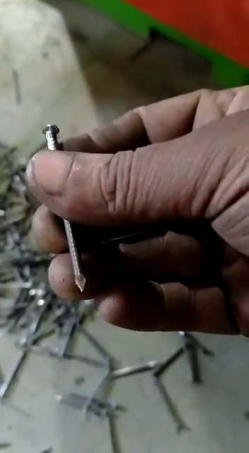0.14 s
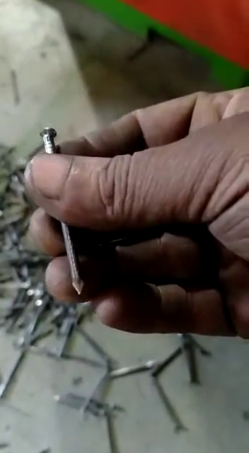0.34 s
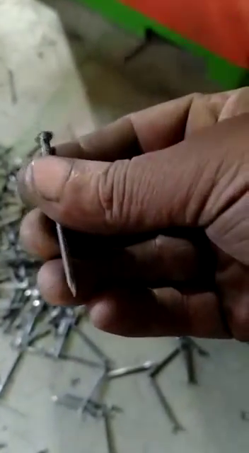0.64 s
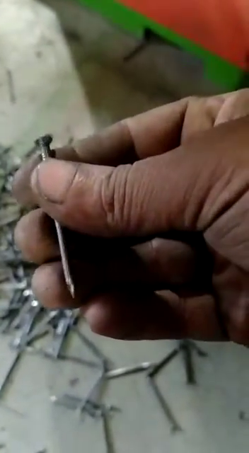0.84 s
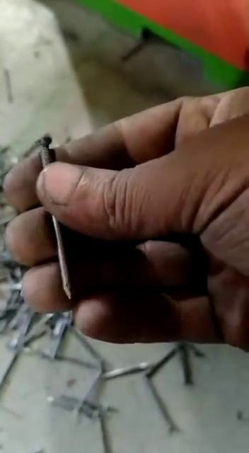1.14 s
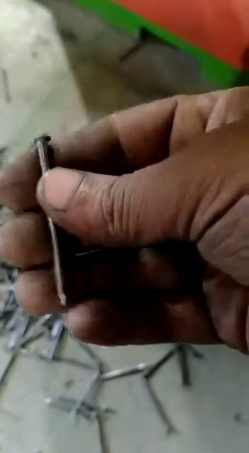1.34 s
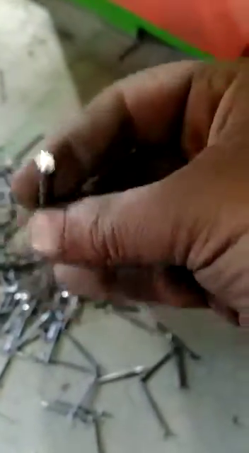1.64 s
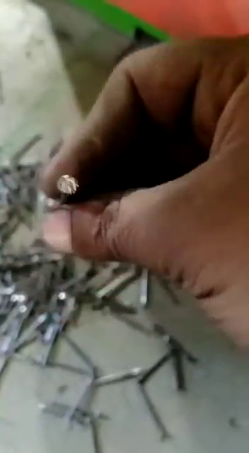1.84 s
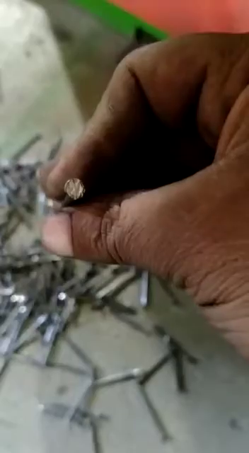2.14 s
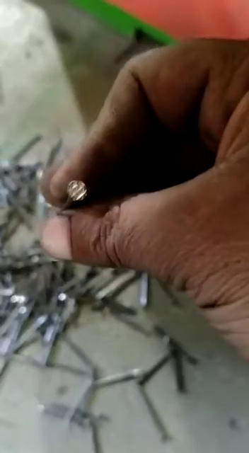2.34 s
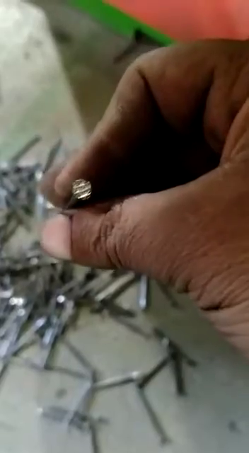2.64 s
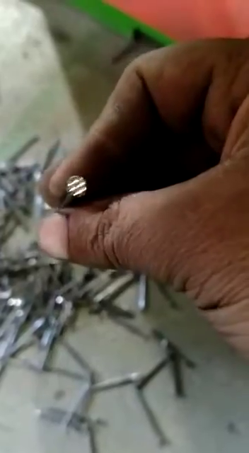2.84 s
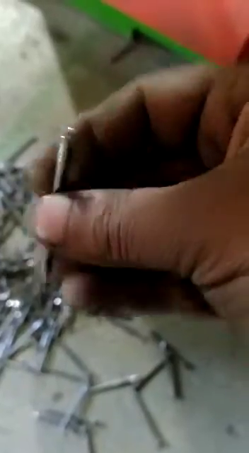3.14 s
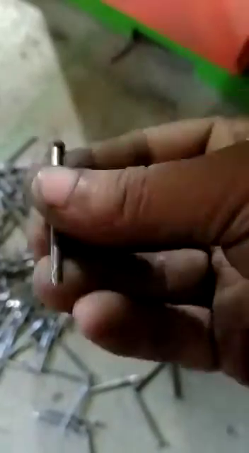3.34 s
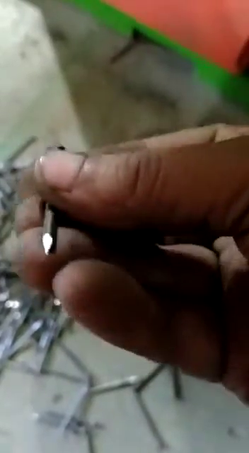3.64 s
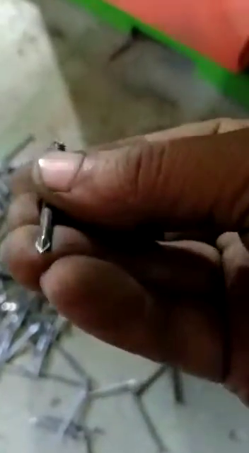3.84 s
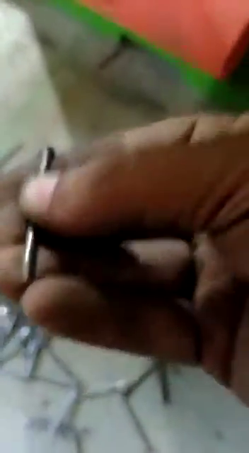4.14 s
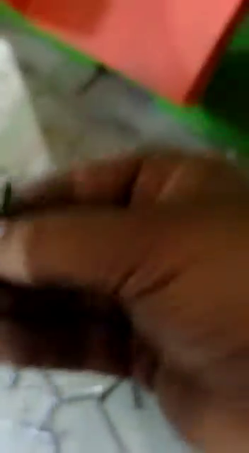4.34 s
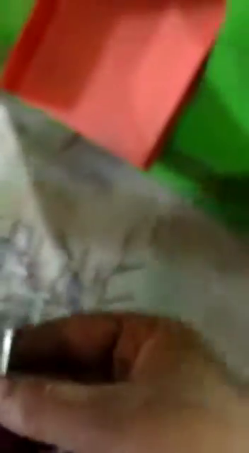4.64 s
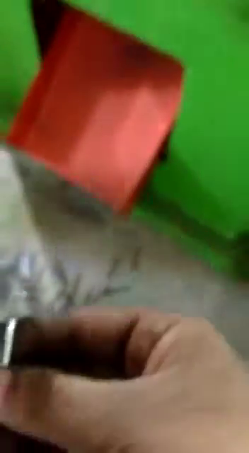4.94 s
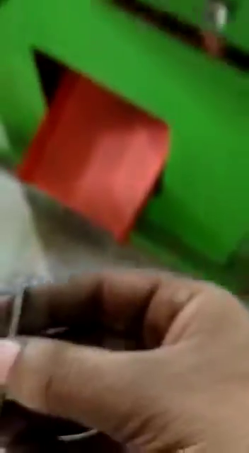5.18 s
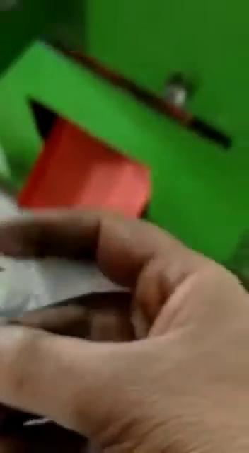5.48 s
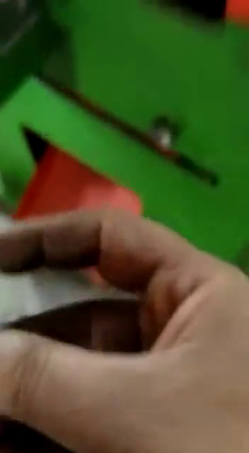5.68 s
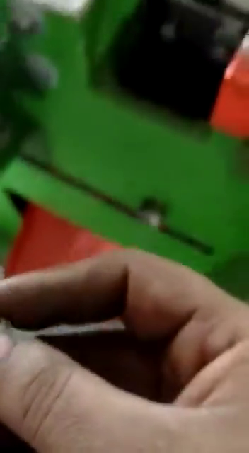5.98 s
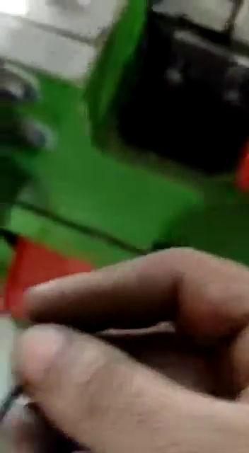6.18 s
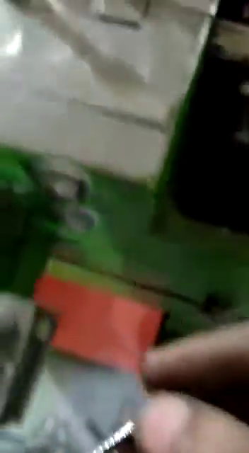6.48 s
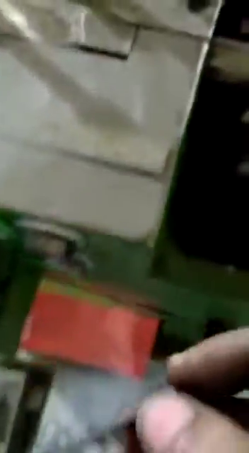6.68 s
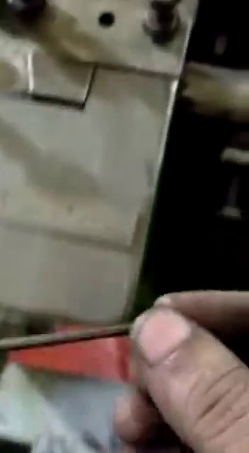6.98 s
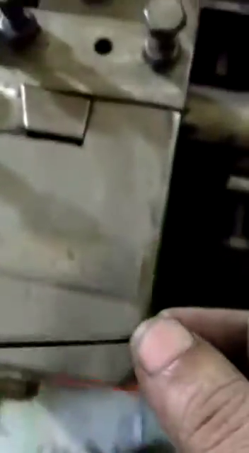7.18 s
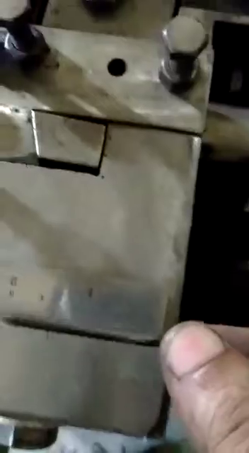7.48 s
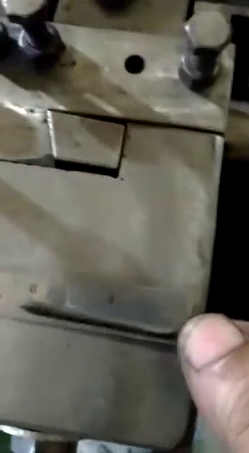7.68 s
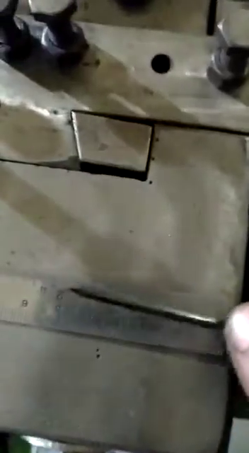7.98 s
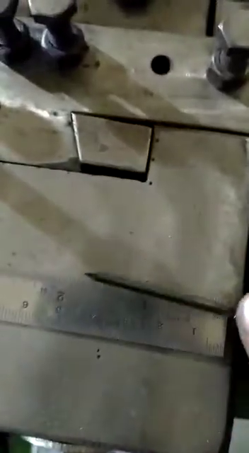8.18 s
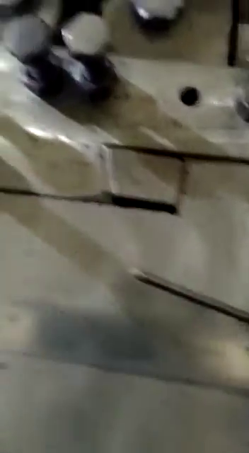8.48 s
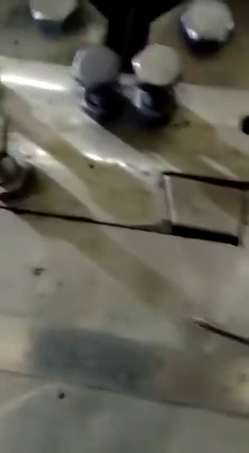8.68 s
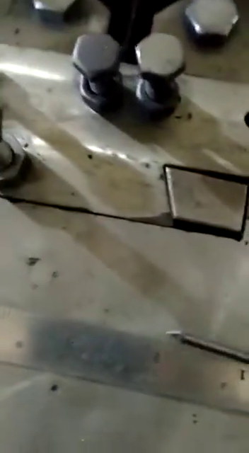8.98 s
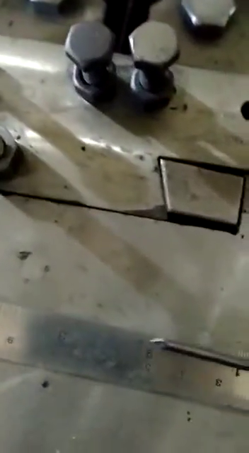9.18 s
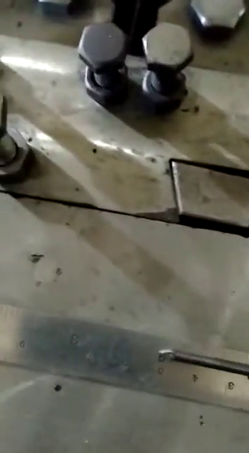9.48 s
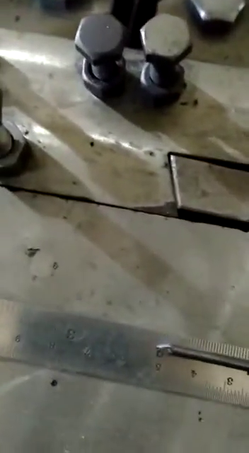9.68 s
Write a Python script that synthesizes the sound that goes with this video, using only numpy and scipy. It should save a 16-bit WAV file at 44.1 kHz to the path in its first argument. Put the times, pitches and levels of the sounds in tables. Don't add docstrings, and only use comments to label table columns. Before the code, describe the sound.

In a hard-walled workshop a nail-making machine runs without pause. A very high, shivering wire squeal sags in pitch and pulses with the cams, above a dense ringing steel rattle and low rumble. Scattered nails ping brightly. Far off, a heavy press thumps about every two seconds with a booming tumble. Heard through a handheld phone, wide stereo, compressed and a little harsh.

```python
import sys
import numpy as np
from scipy import signal
from scipy.fft import rfft, irfft
from scipy.io import wavfile
from scipy.ndimage import uniform_filter1d, minimum_filter1d

SR = 44100
rng = np.random.default_rng(int(sys.argv[2]) if len(sys.argv) > 2 else 0)


def unload_wav(signal):
    wavfile.write(
        sys.argv[1],
        SR,
        np.round(np.clip(np.atleast_2d(signal).T, -1, 1) * 32767).astype(np.int16),
    )


def decibels_to_gain(level_db):
    exponent = np.asarray(level_db, float) / 20
    return 10 ** exponent


N = 433043

# [f/Hz, level/dB]
DIN_SPECTRUM = [(260, -51), (450, -2.5), (550, -6.5), (1660, -6), (2450, -5), (3020, -3.5), (3280, -5),
                (3930, -4.5), (5200, -8), (6000, -8), (6800, -9.5), (7400, -9.5), (8800, -7), (9900, -12),
                (11400, -19.5), (12400, -19.5)]
# [f/Hz, level/dB]
RUMBLE_SPECTRUM = [(15, -56), (25, -32), (119, -5), (181, -2.5), (220, -6), (320, 3), (366, -4.5),
                   (401, 2.5), (479, -17.5), (719, -13.5), (900, -20.5), (1170, -6.5), (1980, -120)]
# [f/Hz, level/dB]
THUD_SPECTRUM = [(41, -64), (70, -46), (210, 3), (248, -5), (353, 2.5), (398, -8.5), (432, 3), (520, -9),
                 (640, -13.5), (1800, -17.5), (2340, -68), (3960, -120)]
# [f/Hz, likeness/1]
LIKENESS = [(60, 1), (130, 0.98), (270, 0.92), (580, 0.39), (1240, 0.031), (2640, -0.098), (5630, 0.12),
            (12000, -0.16)]
# [f/Hz, left minus right/dB]
LEAN_LEFT = [(60, 5), (130, -3), (270, 1.5), (580, -5.5), (1240, -3), (2640, -0.5), (5630, -3),
             (12000, -13)]

# [t/s, level/dB, boom f/Hz]
PRESS_STROKES = [
    (1.741, -11.5, 350),
    (3.899, -10, 336),
    (6.061, -13, 220),
    (8.186, -12.5, 296),
]
# [delay/s, level/dB, share of the blow's own pitch beside the hall's/1]
TUMBLE_BLOWS = [
    (0, -0.5, 0.29),
    (.051, -9.5, 0.7),
    (.125, -9.5, 0.856),
]
# [t/s, level/dB, boom f/Hz]
LIGHT_KNOCKS = [(1.013, -18.5, 316), (1.089, -22, 374), (1.449, -23, 350), (1.75, -25, 193),
                (1.93, -17.5, 339), (2.049, -17, 325), (2.23, -24, 304), (2.667, -30, 376),
                (3.219, -17, 312), (3.905, -22, 345), (4.08, -17, 368), (4.47, -22, 346), (5.353, -16, 339),
                (5.799, -20, 291), (6.124, -17, 292), (6.126, -22, 207), (6.16, -25, 201),
                (6.205, -21.5, 208), (6.31, -25, 303), (6.38, -19, 353), (7.323, -21, 341),
                (8.295, -20, 194), (8.388, -26, 316), (9.662, -20.5, 390), (9.72, -25, 265)]
# [start t/s, length/s, level/dB]
PLATE_SHAKES = [(1.779, 0.11, -14.5), (2.069, 0.06, -24.5), (3.848, 0.028, -23), (3.947, 0.03, -25),
                (3.999, 0.044, -30), (4.098, 0.029, -30), (6.078, 0.055, -22), (6.15, 0.042, -34),
                (6.245, 0.04, -26), (8.208, 0.057, -17.5), (8.331, 0.032, -24), (8.379, 0.043, -24)]

# [t/s, wire pulls done/1]
PULLS_DONE = [(-.235, -1), (2.92, 10), (4.358, 15), (5.528, 19), (6.677, 23), (10.1, 35)]
# [place/turns, width/turns, squeal level/dB, rattle level/dB]
CAM_STROKES = [
    (.11, .095, -3.6, 1.1),
    (.53, .07, -2.4, .7),
]
# [squeal/dB, rattle/dB at the first stroke, squeal/dB, rattle/dB at the second]
TURN_CHANGES = [(1.0, -2.0, 11, -6), (1.5, -0.5, -7, -3.5), (-0.5, 0, -1, -2), (1.5, -1, 1.5, -1),
                (0, 0, -6.5, 0), (-1, -0.5, -0.5, -2), (-1, -1, -2, 0), (4.5, 3.5, -1, -1.5),
                (0.5, -0.5, -3, -3), (3.5, -0.5, -2, 0), (7, 1, 2, -0.5), (8, 2, 1.5, -0.5),
                (5, 1, 3.5, 0.5), (4, 3.5, 3.5, 2), (4.5, 4, -1.5, 0), (-1.5, -1, -0.5, -0.5),
                (0.5, 0.5, 0.5, 1), (1, 0, -3, -1), (4.5, 1, 3, 0), (3, 1, 3.5, 2.5), (3, 0, 3, 2),
                (0.5, 0, 3, 2), (-3, 1.5, 2.5, 0), (-0.5, 1, -3.5, -1.5), (2, 0.5, -2, -1),
                (-3.5, -2, 2, -1), (-1, 0.5, 4, 0.5), (3.5, -0.5, 2, -0.5), (-1, -0.5, -2.5, -1.5),
                (-2, -1, -1, 1), (-2, 0, 0.0, 0.5), (1.5, 1, 5, 1), (2.5, 1, 1, -2), (7, 2, 6, 1),
                (2, 1, 2.5, 3), (-13, -5, -0.5, -1.0)]

# [f/Hz, width/Hz]
FRAME_MODES = [(402, 16), (735, 16), (1302, 16), (1957, 36), (2281, 24), (2419, 22), (2501, 24), (2616, 90),
               (3204, 18), (3262, 34), (3335, 60), (3613, 24), (3744, 32)]
FRAME_LEVELS = [-6.5, -12, -8, -11.5, -2, -3.5, -2.5, -3, 0, 1.5, -2, -5.5, -10]
FRAME_TURNED = [-0.5, 1, -2, 0, -1.5, -1, 0.5, -2, 0, 1, -2.5, 3, -5]
PHONE_TURN = (3, 3.4)
# [f/Hz, width/Hz]
CHUTE_MODES = [(3920, 60), (4170, 70), (4238, 30), (4487, 50), (4585, 26), (4730, 36), (4885, 60),
               (5047, 40), (5405, 45), (5480, 50), (6068, 60), (6445, 120), (8570, 500)]
CHUTE_LEVELS = [-10, -13, -8, -4.5, -13.5, -6.5, -10.5, -8.5, -7, -7, -6, -8, -11]
# [start t/s, stop t/s, level/dB]
WIRE_SCRAPES = [
    (7.4, 6.3, 3),
    (7.53, 7.71, 1.5),
    (5.55, 5.72, -3),
]

# [t/s, level/dB, f/Hz, left minus right/dB]
NAIL_PINGS = [(0.052, -21, 4487, 4), (0.095, -27, 3744, 12), (0.333, -24, 4487, 0), (0.525, -24, 4487, 12),
              (0.656, -20, 4487, 7), (0.796, -23, 4487, 2), (0.897, -21, 4487, 3), (1.027, -20, 3613, 13),
              (1.197, -22, 3613, 12), (1.22, -24, 4487, 6), (1.378, -23, 3744, 2), (1.471, -28, 3613, 3),
              (1.634, -16, 3613, 7), (1.711, -25, 4487, 6), (1.981, -27, 3613, 11), (2.796, -25, 1302, 2),
              (2.834, -20, 3613, 10), (2.917, -28, 1302, 4), (2.927, -21, 3613, 8), (3.036, -25, 1302, 0),
              (3.092, -16.5, 3613, 4), (3.18, -24, 4487, 11), (3.194, -23, 3613, 12), (3.243, -24, 1302, 5),
              (3.438, -25, 3613, 12), (3.502, -28, 1302, 2), (3.697, -19, 3613, 1), (5.008, -24, 4487, -2),
              (5.157, -24, 3613, 12), (5.636, -21, 3744, 9), (6.036, -22, 3613, 5), (6.673, -24, 1302, 0),
              (6.714, -21, 4487, -4), (6.751, -22, 3613, 3), (7.279, -22, 3613, 12), (7.566, -24, 4487, 6),
              (7.599, -24, 3613, 4), (7.651, -24, 4487, 12), (8.632, -17, 3613, 2), (9.228, -20, 4487, 2),
              (9.497, -17.5, 3613, 3),
              (0.269, -23, 3262, 7), (0.385, -20, 3262, 10), (0.527, -21, 3340, 6), (0.665, -17, 3340, 0),
             (0.862, -20, 3204, 9), (0.884, -22, 3340, 10), (1.094, -22, 3262, 12), (1.181, -15, 3262, -3),
             (1.816, -22, 3340, 9), (1.986, -21, 3262, 12), (2.078, -17, 3262, -8), (2.212, -19, 3204, 2),
             (2.355, -21, 3262, 12), (2.5, -16, 3340, 2), (2.636, -21, 3262, 2), (2.682, -21, 3340, 12),
             (2.808, -25, 3204, 11), (2.808, -23, 3262, 3), (2.961, -22, 3262, -7), (3.399, -24, 3340, 8),
             (3.506, -17, 3204, 4), (3.527, -25, 3340, -1), (3.809, -22, 3262, 5), (4.184, -17, 3204, 2),
             (4.916, -19, 3204, 11), (5.022, -20, 3340, -10), (5.285, -23, 3340, 12), (5.608, -31, 3340, 2),
             (5.648, -22, 3262, 9), (6.074, -24, 3204, 5), (6.731, -27, 3204, 1), (6.793, -22, 3340, 12),
             (7.569, -28, 3340, 12), (7.959, -17.5, 3262, 10), (8.127, -21, 3262, 4), (8.352, -21, 3340, 5),
             (8.696, -18, 3262, 14), (8.855, -23, 3262, 2), (9.073, -21, 3262, 12), (9.126, -18, 3340, 4),
             (9.205, -16.5, 3204, 12), (9.252, -13, 3262, -1), (9.309, -20, 3340, -10),
             (9.644, -21, 3340, 11), (9.736, -16, 3262, -5),
              (0.204, -17.5, 2501, -5), (0.321, -28, 2501, 11), (0.482, -23, 2501, 1),
             (0.676, -20.5, 2281, 11), (0.723, -22, 2419, 8), (0.81, -21, 2501, 9), (0.986, -24, 2419, 12),
             (1.037, -22, 2501, 11), (1.575, -22, 2419, 9), (1.756, -22, 2501, -6), (2.364, -21, 2419, 12),
             (2.41, -19.5, 2281, 13), (2.5, -18, 2419, 6), (2.531, -20, 2281, 12), (2.65, -19, 2501, -10),
             (2.79, -20, 2281, 9), (3.086, -20, 2281, 14), (3.186, -34, 2281, 2), (3.245, -27, 2419, 12),
             (3.345, -24, 2281, 0), (3.477, -23, 2281, 12), (3.619, -16, 2501, 1), (3.695, -25, 2501, 11),
             (3.948, -20, 2419, 7), (4.093, -20, 2419, 8), (4.224, -17.5, 2281, 9), (4.247, -20, 2419, 10),
             (4.343, -20, 2501, -4), (4.658, -24, 2501, 6), (5.08, -23, 2281, 7), (5.234, -21, 2501, -3),
             (5.353, -26, 2501, 1), (5.642, -24, 2419, 0), (5.917, -18, 2419, 6), (6.218, -21, 2281, 12),
             (6.219, -12, 2501, 4), (6.411, -22, 2501, -5), (6.487, -25, 2501, 0), (6.725, -17, 2419, 13),
             (7.62, -17.5, 2281, 0), (7.843, -22, 2419, 6), (8.1, -28, 2419, 9), (8.104, -27, 2281, 6),
             (9.363, -16.5, 2419, 11)]

# [t/s, squeal f/Hz, sag at a pull/Hz, drift of guide modes/Hz, second contact level/dB]
WIRE_TENSION = [(0, 10815, 118, -25, -17), (1.5, 10808, 120, -28, -18), (2.3, 10780, 108, -45, -22),
                (2.9, 10790, 115, -40, -18), (3.6, 10820, 100, -8, -11), (5, 10830, 98, 0, -9),
                (6.2, 10842, 104, 8, -9), (8, 10838, 100, 10, -9), (9.82, 10846, 108, 12, -9)]
# [f/Hz, width/Hz]
GUIDE_MODES = [(10845, 90), (10698, 60), (10770, 70), (10950, 70)]
GUIDE_SHARES = [.9, .95, -.25, .45]
# [t/s, width/s, left level/dB, right level/dB]
GRIP_SLIPS = [(2.78, 0.066, -0.5, -4.5), (3.25, 0.03, -4, -5.5), (4.97, 0.019, -3, 3),
              (5.42, 0.021, 6.5, 8), (5.64, 0.064, -12.5, -13.5), (6.6, 0.062, 6, 0),
              (6.78, 0.046, -9.5, -7.5), (7.58, 0.045, -6.5, -4.5), (9.05, 0.024, 0.5, 8),
              (9.43, 0.019, 10, -6)]
# [t/s, squeal level/dB, squeal left minus right/dB, din level/dB, din left minus right/dB]
PHONE_MOVES = [(0, -13.5, 2, -21, 3.5), (1.5, -13.5, 0.7, -21.5, 4), (2.7, -14.5, 0, -21, 4),
               (3.6, -14.5, 2.5, -22.5, 4.5), (5, -13, 4, -22.5, 3.5), (6.3, -13.5, -0.7, -22.5, 3.5),
               (7.5, -10.5, 2.5, -21.5, 4), (9.82, -11.5, 2.7, -22.5, 4.5)]


def evened(x):
    return x / np.sqrt(np.mean(x ** 2, -1, keepdims=True) + 1e-20)


def steadied(x):
    return x / np.sqrt(uniform_filter1d(x ** 2, size=3500, axis=1))


def read(points, hz):
    f, value = np.transpose(points)
    return np.interp(np.log(hz + 1), np.log(f + 1), value)


def curve(rows, axis):
    rows = np.array(rows)
    return np.interp(np.arange(N) / SR, rows[:, 0], rows[:, axis])


def placed(db, pan_db):
    return decibels_to_gain(np.array([db + pan_db / 2, db - pan_db / 2]))


def bumps(place, rows, axis):
    return sum(row[axis] * np.exp(-((place - row[0]) / row[1]) ** 2) for row in rows)


def wander(rate_hz, channels):
    z = rfft(rng.standard_normal((channels, N)))
    smooth = np.exp(-(np.fft.rfftfreq(N, 1 / SR) / rate_hz) ** 2)
    return evened(irfft(z * smooth, N))


def wash(spectrum, patchy_db, count=513):
    hz = np.fft.rfftfreq(1024, 1 / SR)[:count]
    a, b, c, d, patches = rng.standard_normal((N // 256 + 5, count, 5)).T
    patches = uniform_filter1d(patches, size=14, axis=0)
    patches = uniform_filter1d(patches, size=10, axis=1)
    same = np.clip(read(LIKENESS, hz), -1, 1)[:, None]
    left = a + 1j * b
    right = same * left + np.sqrt(1 - same ** 2) * (c + 1j * d)
    db = read(spectrum, hz)[:, None] + patchy_db * patches / patches.std()
    z = np.zeros((2, 513, a.shape[1]), complex)
    z[:, :count] = left, right
    z[:, :count] *= placed(db, read(LEAN_LEFT, hz)[:, None])
    x = signal.istft(z, nperseg=1024, noverlap=768)[1][:, :N]
    return x / x.std()


def hall(x, t60, direct_db, size):
    padded = np.pad(x, (size, 2 * size))
    pieces = np.lib.stride_tricks.sliding_window_view(padded, 2 * size)[::size]
    decay = decibels_to_gain(-60 * np.arange(2 * size) / SR / t60)
    tail = rng.standard_normal((len(pieces), 2, 2 * size)) * decay
    tail /= np.linalg.norm(tail, axis=2, keepdims=True)
    tail[:, :, 0] = decibels_to_gain(direct_db) * np.sign(tail[:, :, 0])
    faded = pieces * signal.windows.cosine(2 * size)
    heard = signal.fftconvolve(faded[:, None], tail, axes=2)
    out = np.zeros((2, (len(pieces) + 4) * size))
    for k, piece in enumerate(heard):
        out[:, k * size:][:, :piece.shape[1]] += piece
    return out[:, size:size + N]


def cams(axis):
    pulls = curve(PULLS_DONE, axis=1)
    changes = []
    for turn, row in enumerate(TURN_CHANGES):
        for k, stroke in enumerate(CAM_STROKES):
            changes.append((turn - 1 + stroke[0], stroke[1] + .03, row[2 * k + axis - 2]))
    change = np.repeat(bumps(pulls[::64], changes, axis=2), 64)[:N]
    usual = bumps(pulls % 1, CAM_STROKES, axis) + bumps(pulls % 1 - 1, CAM_STROKES, axis)
    return usual + change


def slips_db():
    t = np.arange(N) / SR
    return np.array([bumps(t, GRIP_SLIPS, axis=2), bumps(t, GRIP_SLIPS, axis=3)])


def scrapes_db():
    t = np.arange(N) / SR
    total = 0
    for start, stop, db in WIRE_SCRAPES:
        total = total + db * np.clip((t - start) / 0.046, 0, 1) * np.clip((stop - t) / .008, 0, 1)
    return total


def rumble():
    din_change_db = curve(PHONE_MOVES, axis=3) + 22.34 + cams(axis=3)
    rumble_db = -31.5 + 1.23 * din_change_db
    return wash(RUMBLE_SPECTRUM, patchy_db=0.0, count=48) * placed(rumble_db, .1)


def blows():
    hall_hz = 345
    every = list(LIGHT_KNOCKS)
    for s, db, hz in PRESS_STROKES:
        for late, more_db, own in TUMBLE_BLOWS:
            every.append((s + late, db + more_db, hall_hz + own * (hz - hall_hz)))
    return every


def thumps():
    boom_t60, thud_t60 = 0.37, 0.53
    plate_hz, plate_rise_s, plate_t60 = 401, 0.019, 0.27
    t = np.arange(SR // 2) / SR
    out = np.zeros((2, N + SR))
    body = np.pad(wash(THUD_SPECTRUM, patchy_db=1.2, count=90), ((0, 0), (0, SR)))
    for s, db, hz in blows():
        at = round(s * SR)
        boom = np.sin(2 * np.pi * hz * t) * decibels_to_gain(-6.5 - 60 * t / boom_t60)
        thud = body[:, at:at + len(t)] * decibels_to_gain(-9.0 - 60 * t / thud_t60)
        onset = 1 - np.exp(-t / 0.0029)
        out[:, at:at + len(t)] += decibels_to_gain(db) * onset * (boom + thud)
    for s, length, db in PLATE_SHAKES:
        dying_s = np.maximum(t - 0.56 * length, 0)
        shape = (1 - np.exp(-t / plate_rise_s)) * decibels_to_gain(db + 3.5 - 60 * dying_s / plate_t60)
        out[:, round(s * SR):][:, :len(t)] += shape * np.sin(2 * np.pi * plate_hz * t)
    return out[:, :N]


def rattle():
    modes = FRAME_MODES + CHUTE_MODES
    levels = FRAME_LEVELS + CHUTE_LEVELS
    late_levels = FRAME_TURNED + [0] * len(CHUTE_MODES)
    struck = rng.random(N) < 6500 / SR
    size = decibels_to_gain(1.3 * np.minimum(rng.exponential(1, N), 5)) * struck
    mode = rng.integers(0, len(modes), N)
    echoes = rng.standard_normal((2, N))
    turned = np.interp(np.arange(N) / SR, PHONE_TURN, [-.5, .5])
    rings = np.zeros((2, N))
    for k, ((hz, width), db, late_db) in enumerate(zip(modes, levels, late_levels)):
        smeared = signal.lfilter([1], [1, -np.exp(-1 / (.035 * SR))], size * (mode == k))
        push = smeared * (echoes if k else echoes[[0, 0]])
        r = np.exp(-np.pi * 1.3 * width / SR)
        poles = [1, -2 * r * np.cos(2 * np.pi * hz / SR), r * r]
        ring = evened(signal.lfilter([1], np.convolve(poles, poles), push))
        ring /= uniform_filter1d(ring ** 2, size=4000, axis=1) ** .32
        rings += ring * placed(db, read(LEAN_LEFT, hz))[:, None] * decibels_to_gain(late_db * turned)
    return rings / rings.std()


def din():
    clatter = .2
    flicker = wander(rate_hz=73, channels=3)
    flicker = decibels_to_gain(0.5 * flicker[:2] + 0.63 * flicker[2])
    mix = wash(DIN_SPECTRUM, patchy_db=1.0) * flicker + decibels_to_gain(-3.5) * rattle()
    db = curve(PHONE_MOVES, axis=3) + cams(axis=3) + 2.66
    gains = placed(db, curve(PHONE_MOVES, axis=4))
    return mix / mix.std() * gains * decibels_to_gain(scrapes_db() - clatter * slips_db())


def pings():
    t = np.arange(SR // 4) / SR
    out = np.zeros((2, N + SR))
    rows = NAIL_PINGS
    shape = decibels_to_gain(-2.5 - 60 * t / .36) * (1 - np.exp(-t / .012))
    phases = rng.random((len(rows), 2, 1)) * [[0], [.25]]
    for (s, db, hz, pan_db), phase in zip(rows, phases):
        ring = shape * np.sin(2 * np.pi * (hz * t + phase))
        out[:, round(s * SR):][:, :len(t)] += placed(db, pan_db)[:, None] * ring
    return out[:, :N]


def pitch():
    sag_turns, rebound_turns = .42, .29
    turn = curve(PULLS_DONE, axis=1) % 1
    slack = np.maximum(1 - turn / rebound_turns, 1 - (1 - turn) / sag_turns).clip(0, 1)
    sag = np.sin(np.pi / 2 * slack) ** 2
    return curve(WIRE_TENSION, axis=1) - curve(WIRE_TENSION, axis=2) * sag


def grip_db():
    uneven = wander(rate_hz=6.0, channels=2)
    uneven -= uniform_filter1d(uneven, size=14000, axis=1)
    return slips_db() + cams(axis=2) + 0.23 * uneven


def squeal():
    shiver, other = wander(rate_hz=200, channels=2).clip(-2.6, 2.6)
    shiver -= uniform_filter1d(shiver, size=1800)
    pull = np.roll(pitch(), -800)
    shiver_hz = 58 + .08 * (curve(WIRE_TENSION, axis=1) - pull)
    hz = 10800 + 1.35 * (pull - 10800) + shiver_hz * shiver - 8 * (shiver ** 2 - 1)
    grip = decibels_to_gain(2.2 * wander(rate_hz=130, channels=1)[0])
    drift = curve(WIRE_TENSION, axis=3)
    tone = grip * np.exp(2j * np.pi * np.cumsum(hz - drift) / SR)
    steady_hz = 10870 + 50 * other
    tone += decibels_to_gain(curve(WIRE_TENSION, axis=4)) * np.exp(2j * np.pi * np.cumsum(steady_hz) / SR)
    ringing = 0
    for (mode_hz, width), share in zip(GUIDE_MODES, GUIDE_SHARES):
        ringing = ringing + share * signal.lfilter(*signal.iirpeak(mode_hz, mode_hz / width, SR), tone)
    tone = tone + ringing
    tone = (tone * np.exp(2j * np.pi * np.cumsum(drift) / SR)).real
    left, right = hall(tone, t60=.32, direct_db=-24, size=4500)
    mid, side = steadied(np.array([left + right, left - right]))
    both = steadied(np.array([mid + side, mid - side]))
    gains = placed(curve(PHONE_MOVES, axis=1) + 4.13, curve(PHONE_MOVES, axis=2))
    return both * gains * decibels_to_gain(grip_db())


def scene():
    far_press = thumps() * decibels_to_gain(np.array([[-.6], [.6]]))
    return rumble() + far_press + din() + pings() + squeal()


def thinned(x, weak_db, open_share):
    hz, _, z = signal.stft(x, SR, "cosine", nperseg=2048, noverlap=1024)
    power = (abs(z) ** 2).sum(0)
    nearby = uniform_filter1d(power, size=40, axis=0)
    valley = uniform_filter1d(power, size=5, axis=0) < decibels_to_gain(2 * weak_db) * nearby
    keep = ~valley | ((hz < 3750) | (hz > 10080))[:, None]
    for lo_hz, hi_hz in ((10080, 10280), (11090, 11270)):
        flank = (hz > lo_hz) & (hz <= hi_hz)
        flank_power = power[flank].sum(0)
        keep[flank] = flank_power > np.quantile(flank_power, .1)
    top = hz > 11270
    level = uniform_filter1d(power[top], size=12, axis=0) + 2 * power[top].mean(0)
    level = level * power.sum(0)
    level /= uniform_filter1d(level, size=14, axis=1) ** .75
    keep[top] = level > np.quantile(level, 1 - open_share)
    return signal.istft(z * keep, SR, "cosine", nperseg=2048, noverlap=1024)[1][:, :N]


def roll_off(x):
    return signal.sosfilt(signal.butter(12, 11980, fs=SR, output="sos"), x)


def record(dry):
    level_db = 10 * np.log10(abs(uniform_filter1d(dry ** 2, size=2600, axis=1)) + 1e-12)
    lifted = dry / decibels_to_gain(0.3 * uniform_filter1d(level_db + 12.5, size=900, axis=1))
    top = -minimum_filter1d(-abs(lifted), size=64, axis=1)
    over_db = np.maximum(20 * np.log10(top + 1e-9) + 3.64, 0)
    held = lifted / decibels_to_gain(0.79 * uniform_filter1d(over_db, size=64, axis=1))
    mix = thinned(held, weak_db=-2.6, open_share=.11)
    return roll_off(mix)


dry = scene()
out = record(dry)
unload_wav(out)
```